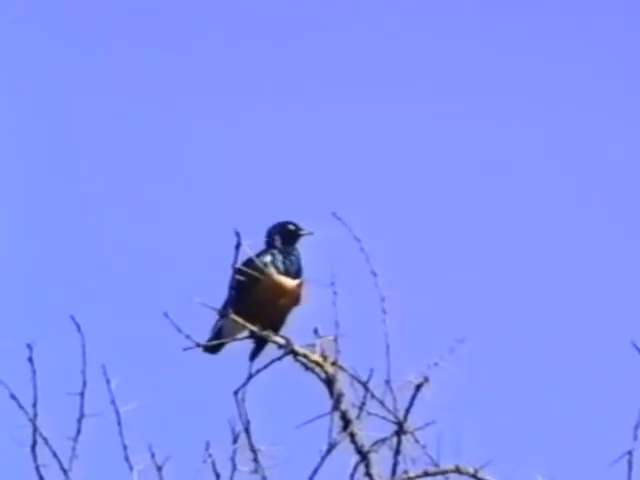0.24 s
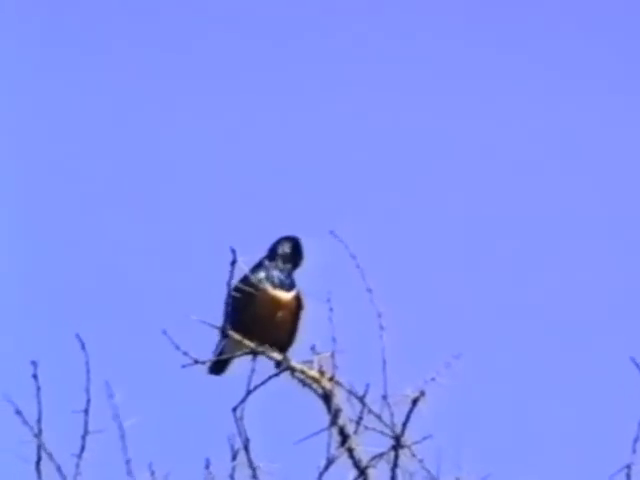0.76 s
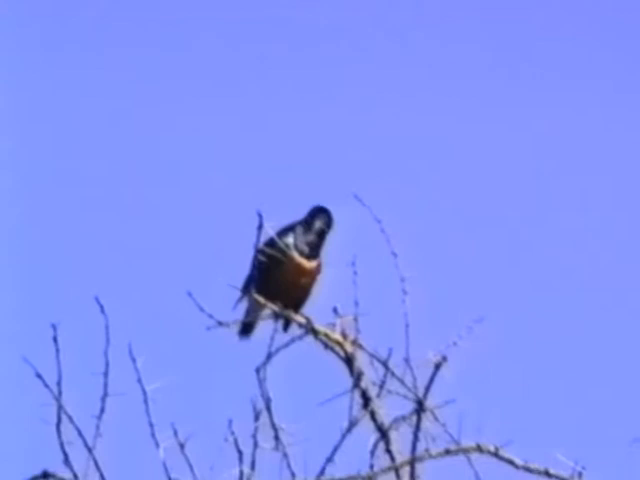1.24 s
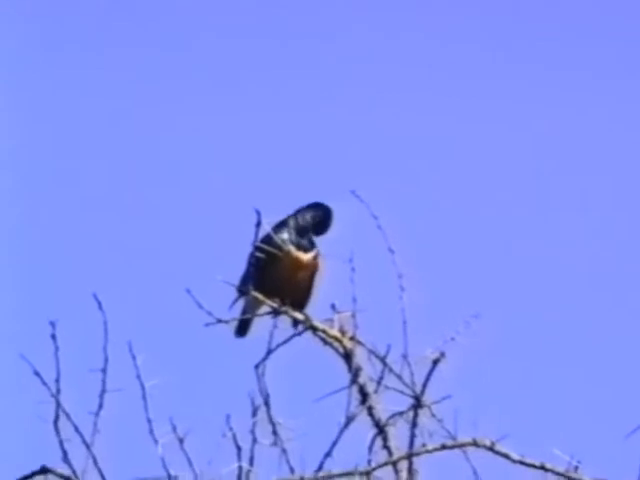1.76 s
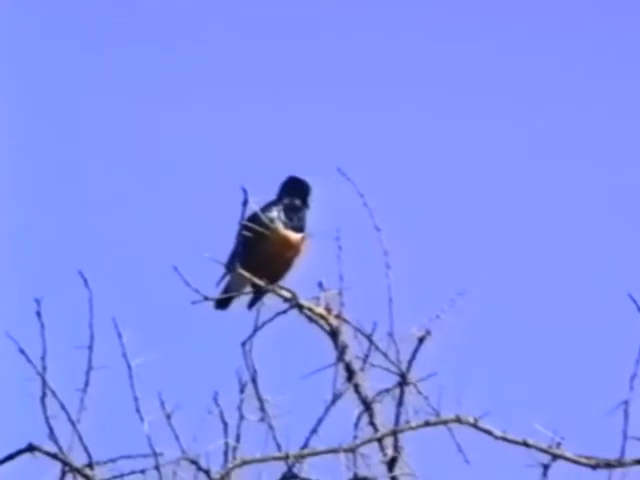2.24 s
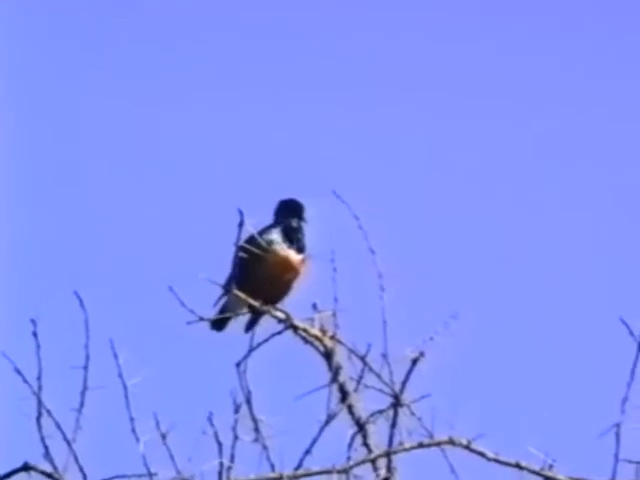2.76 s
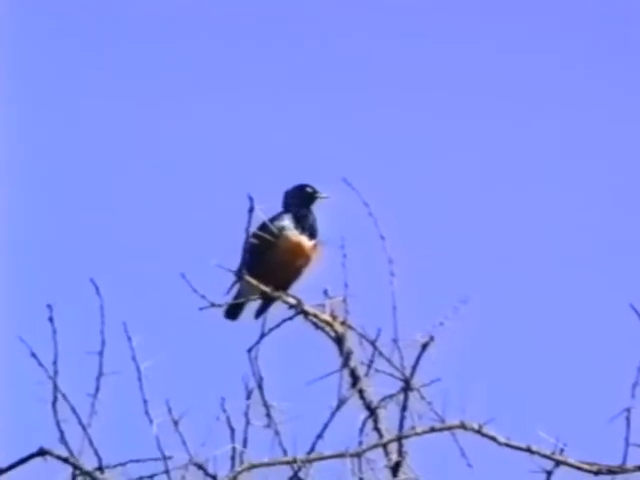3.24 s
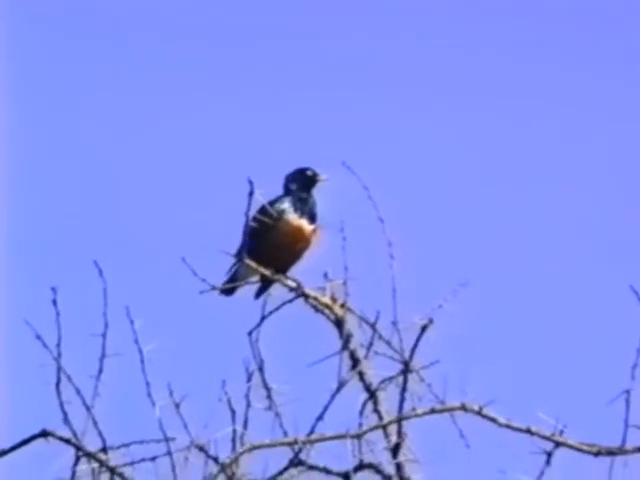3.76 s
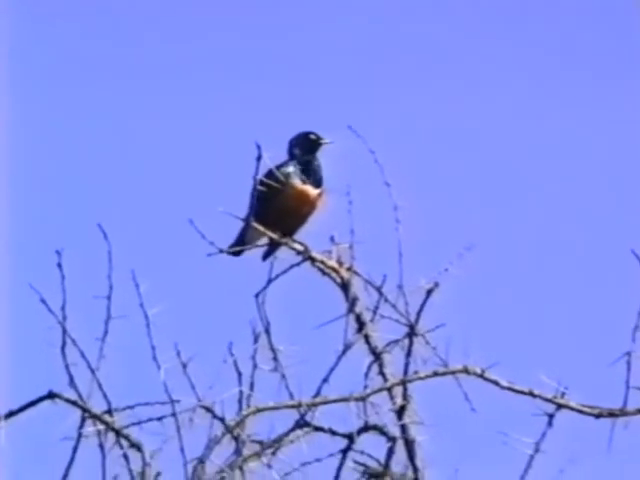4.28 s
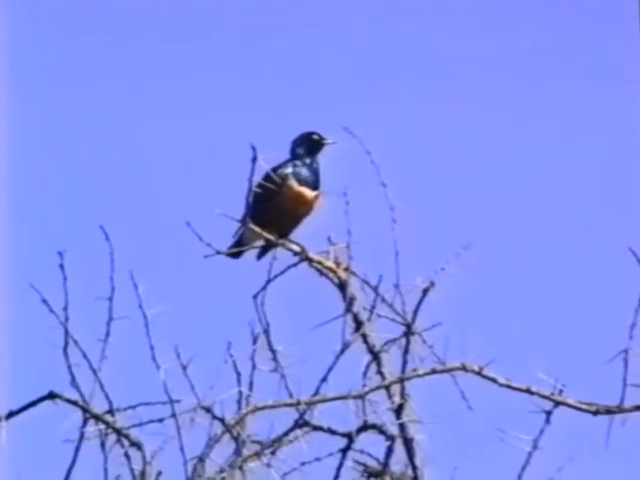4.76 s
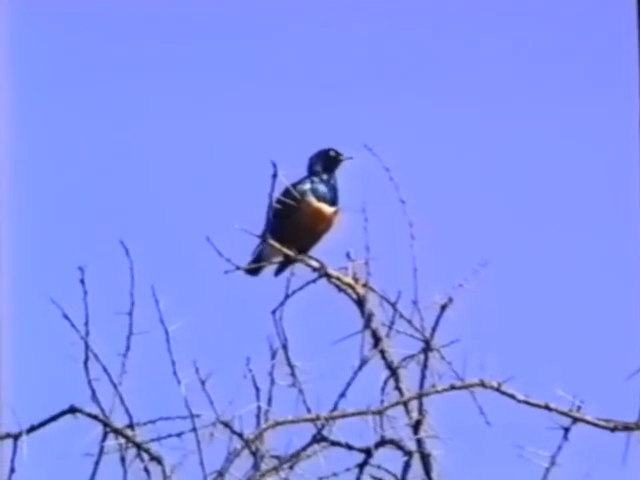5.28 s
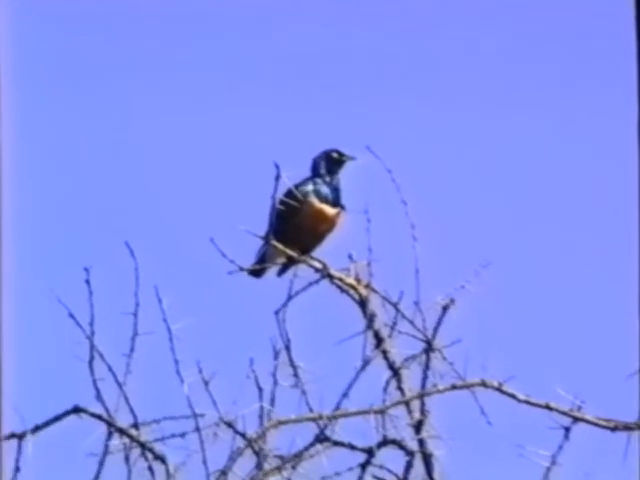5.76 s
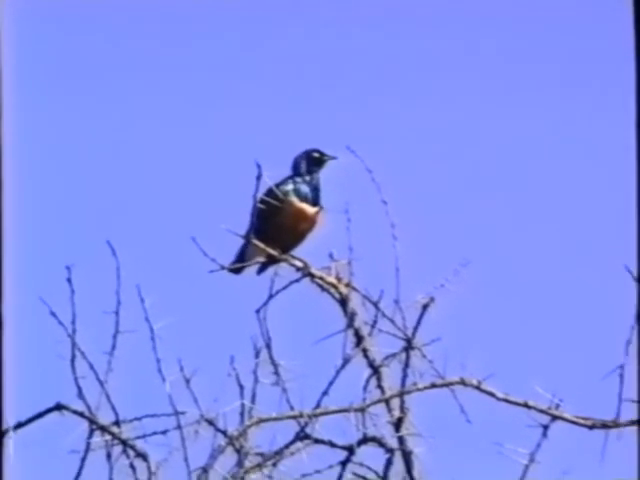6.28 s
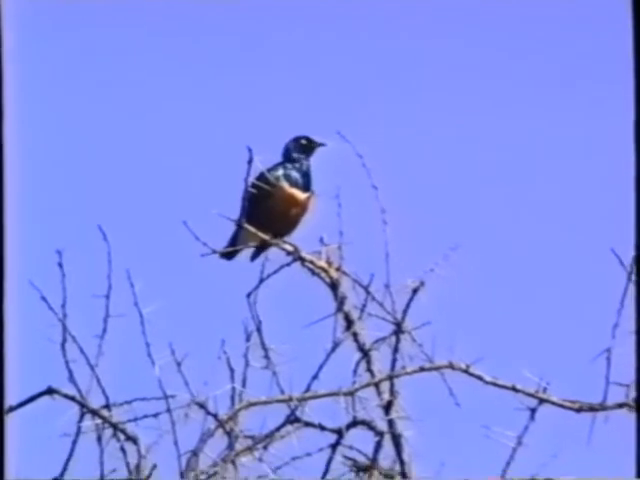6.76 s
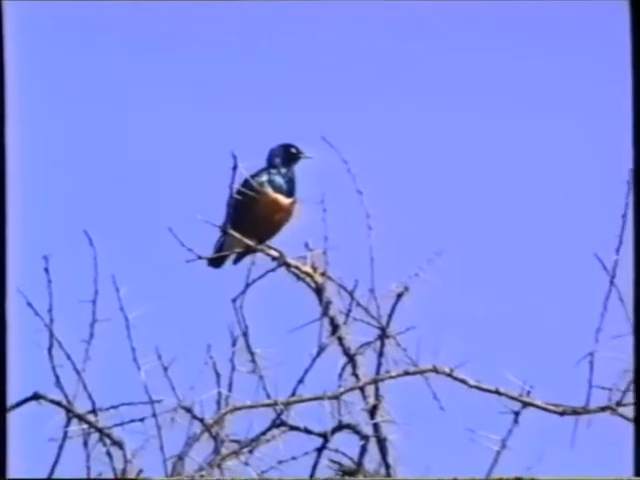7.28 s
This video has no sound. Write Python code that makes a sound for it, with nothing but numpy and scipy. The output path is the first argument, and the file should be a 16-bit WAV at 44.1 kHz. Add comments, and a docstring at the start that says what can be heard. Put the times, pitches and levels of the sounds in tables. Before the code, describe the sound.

A low mechanical hum and soft wind buffeting, far thin whistles, then a perched bird bursts into squeaky, scratchy chatter and buzz-to-whistle notes.

```python
"""First you hear a camcorder's own motor hum and hiss, with wind buffeting its microphone now and then.
Faint whistles and dry churrs come from farther off: wavering pure tones and short bursts of grainy noise.
Then a starling on a thorn bush sings chattering glides and whistles with both sides of its syrinx:
one side is a stack of harmonics coloured by windpipe and beak, the other is nearly pure tones.
A few small clicks close by are short, heavily damped rings."""
import sys
import numpy as np
from scipy import signal
from scipy.fft import rfft, irfft
from scipy.io import wavfile
from scipy.ndimage import uniform_filter1d

SR = 44100
rng = np.random.default_rng(int(sys.argv[2]) if len(sys.argv) > 2 else 0)


def to_wav(sig):
    """Store sig (one row per channel, or 1-D mono) as 16-bit WAV at the path in sys.argv[1].

    Samples outside -1..1 are clipped; the rate is SR.
    """
    pcm = np.clip(np.atleast_2d(sig), -1, 1) * 32767
    pcm = np.round(pcm).astype(np.int16)
    wavfile.write(sys.argv[1], SR, pcm.T)  # frames by channels


N = 331648
TIME = np.arange(N) / SR  # s
ALONG = np.linspace(0, 1, 200)  # how far through a note we are, 0-1
ENDS = (2 * ALONG - 1) ** 2  # 1 at both ends of a note, 0 in its middle
EDGE_HZ = 15750  # top of the recorder's band

# Levels in the tables are before any trim, wobble, filter or echo in the functions.

# tape drum: turns a second, and the multiple of that rate that hums
DRUM_HZ, HUM_ORDER = 12.5, 13
# unevenness within one turn of the drum: (multiple of drum rate, throb depth/0-1, phase swing/rad)
DRUM_UNEVENNESS = [(1, 0.17, 0.57), (2, 0.31, 0.056), (3, 0, 0.017), (4, 0, 0.2)]
# steady whines of the tape transport: (f/Hz, level/dB rms)
TRANSPORT_WHINE = [(263.8, -66.5), (452.2, -66.5), (694.4, -82), (899.0, -64.5), (957, -82), (1044, -73),
                   (1077, -72), (1540, -78.5), (1846, -77), (1949, -74), (2099, -81.5), (2401, -73),
                   (2552, -73), (2702, -72.5)]
# colour of the mechanism's whirr and hiss: (f/Hz, relative level/dB per Hz)
WHIRR_COLOUR = [(20, -6), (60, -22.5), (110, 13), (160, 19), (230, 3), (330, 5.5), (470, 2), (620, -1),
                (750, 2.5), (890, 4.5), (1200, -6), (2000, -8), (2700, -8.5), (3300, -10.5), (6000, -15),
                (16000, -16)]
WHIRR_DB = -51

# gusts on the microphone: (t/s, time to swell and to die/s, level/dB)
WIND_GUSTS = [(.06, .08, -53), (.26, 0.081, -50), (1.0, 0.061, -50), (1.38, 0.36, -52.5),
              (2.1, 0.26, -53.5), (3.2, .06, -53), (4.1, 0.24, -44), (4.62, 0.25, -66), (5.32, 0.12, -38.5),
              (5.98, 0.18, -44.5), (6.28, 0.18, -37), (7.46, 0.13, -46.5)]
# colour of the wind rumble: (f/Hz, relative level/dB per Hz)
WIND_COLOUR = [(10, -13), (22, -26), (35, -0.5), (65, -1.5), (110, -8), (200, -13), (400, -28.5),
               (900, -34), (3000, -44.5), (15000, -74)]
CALM_DB = -66  # wind level between gusts

# clicks and knocks near the microphone: (t/s, level/dB of the envelope's peak, ring f/Hz, swell time/s)
NEAR_CLICKS = [(2.267, -37, 1400, 0.00024), (4.516, -35.5, 900, 0.00063), (4.5153, -43.5, 2920, 0.00042),
               (4.526, -39, 490, 0.00096), (6.4265, -19.5, 2180, 0.00029), (6.4268, -31, 7740, 0.00012),
               (6.43, -44, 1940, 0.00027), (6.597, -39, 1000, 0.00047), (6.5997, -28, 390, 0.00088),
               (7.0727, -11.5, 4340, 0.000018)]

# faint slurs and pips: (t/s, length/s, from f/Hz, to f/Hz, bend, level/dB)
# here and below, a bend under 1 moves early and one over 1 moves late
FAINT_GLIDES = [(0.472, 0.085, 1920, 1460, 1.1, -68.5), (0.643, .03, 3210, 3210, 0.48, -68.5),
                (1.15, .03, 3310, 3270, 1.0, -69), (1.247, .026, 3360, 3170, 1.2, -64),
                (1.306, .035, 2460, 1530, 1.2, -65), (1.428, .09, 3820, 3210, 0.91, -72),
                (1.51, .04, 2680, 2560, 1.0, -72), (1.59, 0.036, 2840, 2640, 0.79, -64.5),
                (1.719, .018, 5800, 4000, 1.0, -69), (1.929, 0.024, 3210, 2990, .7, -63.5),
                (1.967, .018, 5300, 4400, 0.86, -68), (1.977, 0.038, 2980, 2250, 1.0, -66),
                (2.155, .025, 3250, 3200, 1.0, -70), (2.191, .016, 5340, 3580, 1.1, -66),
                (2.217, .014, 5300, 4930, 1.0, -67), (2.58, .045, 2640, 2760, 1.0, -62.5),
                (2.7, .032, 4400, 5200, 1.6, -67), (3.21, 0.053, 5440, 4130, 0.93, -67.5),
                (3.261, 0.068, 4160, 2800, 0.97, -57.5), (3.33, .028, 2820, 2940, 1.0, -67),
                (4.205, .075, 4800, 5950, 1.0, -73), (7.095, .032, 1720, 1750, 1.0, -56)]
# faint falling whistles that quaver: (t/s, length/s, from f/Hz, to f/Hz, bend, level/dB)
FAINT_QUAVERS = [(0.758, 0.12, 4030, 2770, .7, -65.5), (1.362, 0.16, 3940, 2534, 0.75, -62.5),
                 (2.407, .14, 3990, 2770, 1.2, -62.5)]
QUAVER_HZ, QUAVER_DEPTH = 81, .014  # depth as a share of the pitch
# faint rising whistles: (t/s, length/s, starting f/Hz, level/dB)
FAINT_RISERS = [(2.965, 0.14, 3680, -64.5), (3.512, .142, 3820, -65.5)]
# the climb they share: (share of length, pitch ratio)
SHARED_CLIMB = [(0, 1), (.26, 1.06), (.5, 1.33), (.8, 1.51), (1, 1.7)]
# faint rounded hoots: (t/s, length/s, top f/Hz, level/dB)
FAINT_HOOTS = [(.118, .076, 2110, -65.5), (1.78, .032, 5630, -70), (1.852, 0.083, 4280, -68.5),
               (2.008, 0.066, 2110, -60), (2.32, .072, 2100, -61.5), (2.625, .102, 1864, -61.5),
               (7.018, .09, 2070, -57.5), (7.332, .105, 1870, -59.5)]
HOOT_DROOP = 0.27  # share of the pitch lost at both ends
# short, dry churrs among the faint whistles: (t/s, length/s, level/dB)
DRY_CHURRS = [(0.71, 0.035, -63), (1.32, 0.14, -62.5), (2.03, 0.036, -62), (2.335, 0.054, -56.5)]
# colour of the churrs: (f/Hz, relative level/dB)
CHURR_COLOUR = [(1800, -30), (2700, 4), (3600, 5), (4500, -26)]

# colour of the open beak: (f/Hz, level/dB)
BEAK_COLOUR = [(600, -22), (1100, -11), (2300, -7), (3200, -7), (4400, -3), (5400, -3), (6800, -5),
               (8000, -12), (9500, -27), (14000, -46)]
BEAK_OPEN_HZ = 630  # below this pitch the beak closes and its resonances sink
# resonances of the windpipe: (f/Hz, width/Hz, lift/dB)
WINDPIPE_RESONANCES = [(2410, 1100, 7), (4370, 760, 7.5)]
# harsh stretches of the song: (t/s, length/s, level/dB)
HARSH_STRETCHES = [(5.035, 0.059, -67), (5.355, 0.2, -53), (5.635, 0.027, -46.5), (5.66, 0.13, -56.5),
                   (6.058, 0.063, -49), (6.325, 0.027, -47)]

# the refrain, a low buzz that breaks into a high whistle:
# (t/s of the break, buzz f/Hz, buzz level/dB, whistle top f/Hz, whistle level/dB,
#  second voice f/Hz, second voice level/dB)
REFRAIN_NOTES = [(5.117, 688, -46, 6820, -50.5, 4000, -58), (6.843, 698, -44, 6640, -47.5, 4320, -47),
                 (7.013, 738, -44, 6870, -46, 4000, -51), (7.248, 707, -47.5, 6760, -56, 4280, -51.5)]
BUZZ_HZ = 900  # a note whose average pitch is below this counts as a buzz
# the buzz climbs from a share of its pitch, holds, then lifts and swells just before the break
BUZZ_S, CLIMB_S, CLIMB_FROM = .115, 0.056, 0.5
LIFT_S, LIFT = .011, 0.248  # growth time, and final rise as a share of the pitch
BUZZ_START_DB, BUZZ_HOLD_DB, BUZZ_OVERTONES_DB = -10.5, -8.5, -7
# arch of the refrain's whistle:
# (top after the break/s, rise/s, fall/s, start share of pitch, end share of pitch, width of the top/s)
WHISTLE_ARCH = (0.0062, 0.022, 0.044, 0.27, .61, 0.013)
# arch of the second voice under it, with the same columns
SECOND_ARCH = (.006, 0.0265, 0.019, .91, .82, 0.057)
# chirps that rise and fall: (t/s of the top, rise/s, fall/s, start share of pitch, end share of pitch,
#  width of the top/s, top f/Hz, level/dB, overtones/dB)
RISE_AND_FALL_CHIRPS = [(4.603, .01, 0.021, 0.49, 0.47, 0.0076, 2490, -57.5, -4),
                        (4.876, 0.019, 0.046, .47, .35, 0.012, 5010, -48.5, -2),
                        (6.139, .007, .038, 0.84, 0.41, 0.0047, 2470, -46, 4),
                        (6.294, 0.0084, 0.0025, 0.71, .97, .01, 8300, -45, -3)]
ARCH_DB_PER_OCTAVE = 4.5  # an arch is louder where it is higher
# one-way glides: (t/s, length/s, from f/Hz, to f/Hz, bend, level/dB,
#  level change by the end/dB, overtones/dB)
LEADING_SLURS = [(4.523, 0.027, 2080, 1470, 1.0, -54, -4, -8), (4.755, 0.045, 2150, 1940, 0.91, -61, 1, -8),
                 (4.797, .025, 4270, 1590, .56, -51.5, 0.5, -6), (4.923, .045, 1880, 1300, .9, -63, 7, -9),
                 (5.523, 0.023, 6200, 3760, 0.83, -45, 1, -5), (5.546, .013, 3750, 4030, 1.1, -52, -1, -1),
                 (5.562, 0.056, 3300, 1056, .7, -46.5, -9, 2), (5.609, 0.021, 1066, 1490, 1.3, -53, -2, -6),
                 (5.623, .02, 3270, 2370, .9, -53, 9, -1), (5.646, 0.03, 2355, 2820, 0.88, -44, -3, 1),
                 (5.673, 0.027, 2100, 1830, .8, -50.5, 2, -3), (5.738, 0.085, 1207, 884, .8, -48, -5.5, -7),
                 (6.382, 0.023, 5140, 3680, 1.3, -39, -7, 10),
                 (6.405, 0.09, 2780, 856, 0.81, -42.5, -18.5, 1),
                 (6.746, .034, 2090, 3050, 1.2, -54, 0, 15), (7.148, .03, 2100, 3100, 1.2, -56, -4, 15)]
# free warbles, as short curves; a long warble takes two curves in a row: (t/s, f/Hz, level/dB)
WARBLE_CURVES = [
    [(5.22, 1424, -56), (5.236, 1940, -57), (5.264, 1610, -55), (5.279, 2690, -48)],
    [(5.311, 3520, -46), (5.321, 4820, -39), (5.345, 4620, -38), (5.359, 4220, -46), (5.364, 5440, -36),
     (5.369, 6870, -37), (5.375, 6960, -38), (5.38, 5650, -53)],
    [(5.391, 2440, -38), (5.399, 2970, -42), (5.415, 3070, -43), (5.424, 4830, -52), (5.429, 7180, -37),
     (5.436, 5320, -34), (5.444, 3330, -48), (5.449, 3220, -43), (5.462, 2350, -36)],
    [(5.462, 2255, -42), (5.48, 1776, -53), (5.5, 1530, -51.5), (5.521, 2190, -47)],
    [(5.987, 4130, -39), (5.994, 2730, -54), (6.004, 2494, -42.5), (6.013, 1385, -46), (6.022, 1194, -51),
     (6.05, 1044, -48), (6.07, 1410, -47), (6.088, 1000, -48)],
    [(6.09, 1065, -54), (6.112, 1018, -49), (6.126, 1374, -50), (6.134, 1830, -39)],
    [(6.235, 4600, -35), (6.239, 6920, -35), (6.247, 8000, -48), (6.253, 7940, -42), (6.258, 5080, -33.5),
     (6.263, 3220, -54), (6.271, 2090, -45)],
    [(6.313, 4910, -36), (6.317, 6570, -38), (6.323, 7080, -37.5), (6.329, 6580, -36.5), (6.334, 3790, -44),
     (6.343, 2580, -44), (6.352, 2170, -40), (6.38, 1280, -59)],
]
# a warble's overtones are strongest in the middle register
REGISTER_HZ, REGISTER_OCTAVES, REGISTER_DB, WARBLE_OVERTONES_DB = 2700, 0.88, 15.5, 0
OVERTONES_PER_DB = 0.63  # dB of overtones lost for each dB a note softens
# pure slurs from the other side of the syrinx: (t/s, length/s, from f/Hz, to f/Hz, bend, level/dB)
SECOND_GLIDES = [(4.567, .036, 4940, 4480, 1.1, -62), (4.912, .045, 2950, 1980, 1.0, -57),
                 (4.95, 0.075, 4550, 3740, 1.1, -55.5), (5.365, .072, 1850, 1690, 1.9, -55),
                 (5.462, .008, 4540, 7100, .8, -37), (5.469, .012, 7060, 7450, 1.0, -46),
                 (5.851, 0.023, 3470, 3230, 1.2, -54), (6.058, .018, 6040, 4480, 1.0, -45),
                 (6.315, 0.02, 5020, 3860, .5, -40), (6.926, .07, 2480, 3850, 0.48, -58)]
SLUR_EDGE_DB = -7  # pure slurs, hoots and risers swell from this relative level and sink back to it


def gain_of(db):
    """Turns decibels into amplitude: every 20 dB is a factor of ten."""
    return 10 ** (np.asarray(db) / 20)


def evened(x):
    """Scales a signal to an average (rms) strength of 1."""
    return x / np.sqrt(np.mean(x ** 2) + 1e-20)


def read(points, hz):
    """Reads a spectrum between its points on a log-frequency axis."""
    f, value = np.transpose(points)
    return np.interp(np.log(hz + 1), np.log(f + 1), value)


def add(mix, s, sound):
    """Mixes a sound in at time s, cutting off what runs past the end."""
    part = mix[round(s * SR):][:len(sound)]
    part += sound[:len(part)]


def noise(colour):
    """Steady noise: white noise with each frequency weighted by the colour, rms 1."""
    hz = np.fft.rfftfreq(N, 1 / SR)
    white = rfft(rng.standard_normal(N))
    return evened(irfft(white * gain_of(read(colour, hz)), N))


def waver(rate_hz):
    """Smooth random wobble, rms 1: noise that fades away above the given rate."""
    hz = np.fft.rfftfreq(N, 1 / SR)
    white = rfft(rng.standard_normal(N))
    return evened(irfft(white / (1 + (hz / rate_hz) ** 4), N))


def scatter(x, t60, wet_db):
    """Ground and thorn bushes return a thin, short spray of echoes, fading 60 dB in t60 seconds."""
    t = np.arange(SR // 2) / SR
    strength = rng.standard_normal(len(t))
    present = rng.random(len(t)) < 2000 / SR  # about 2000 echoes a second
    taps = strength * present * (t > .004) * gain_of(-60 * t / t60)
    echoes = signal.fftconvolve(x, taps / np.linalg.norm(taps))[:N]
    return x + gain_of(wet_db) * echoes


def settling(start_db=-3, settle_s=1.0):
    """The motor hum is heard a little softer at first, then its level rises and steadies."""
    return gain_of(start_db * np.exp(-TIME / settle_s))


def motor(hum_db=-44.5, wow=0.24, whine_wow=0.75, whine_db=-1, throb_db=1.26):
    """The drum's hum throbs and sways with every turn; the transport whines thinly above."""
    turn = 2 * np.pi * DRUM_HZ * TIME
    throb, sway = np.ones(N), np.zeros(N)
    for k, depth, swing in DRUM_UNEVENNESS:
        throb += depth * np.cos(round(k) * turn)
        sway += swing * np.cos(round(k) * turn + 2 * np.pi * rng.random())
    out = gain_of(hum_db) * throb * np.sin(HUM_ORDER * turn + sway + wow * waver(6.7))
    for hz, db in TRANSPORT_WHINE:
        level = gain_of(db + whine_db + throb_db * waver(30))
        out += level * np.sin(2 * np.pi * hz * TIME + whine_wow * waver(8.1))
    return np.sqrt(2) * out  # a sine of rms 1 peaks at root 2


def whirr(flicker_db=0.52):
    """Rubbing tape and gears ring the camera body, over hiss: coloured noise that flickers slightly."""
    return gain_of(WHIRR_DB + flicker_db * waver(25)) * noise(WHIRR_COLOUR)


def wind(lumps_db=3.3):
    """Eddies at the microphone rumble with each gust; the powers of calm air and gusts add up."""
    power = gain_of(CALM_DB) ** 2
    for s, swell, db in WIND_GUSTS:
        power = power + (gain_of(db) * np.exp(-abs(TIME - s) / swell)) ** 2
    return noise(WIND_COLOUR) * np.sqrt(power) * gain_of(lumps_db * waver(14))


def clicks(dull_hz=11500, order=3):
    """Each click is a short, heavily damped ring, rounded off in the top treble."""
    out, t = np.zeros(N), np.arange(SR // 30) / SR
    for s, db, hz, swell in NEAR_CLICKS:
        envelope = t / swell * np.exp(1 - t / swell)
        add(out, s, gain_of(db) * envelope * np.sin(2 * np.pi * hz * t))
    return signal.lfilter(*signal.butter(order, dull_hz, fs=SR), out)


def gesture(curves, cycles=9, size=130):
    """Sample numbers, a soft on-off gate and the smoothly joined controls of one curve."""
    s, *columns = curves
    at = np.arange(int(s.min() * SR), int(s.max() * SR))
    # averaging over a few milliseconds rounds the corners
    controls = [uniform_filter1d(np.interp(at / SR, s, c), size, mode="nearest") for c in columns]
    turns = np.cumsum(controls[0]) / SR  # the vibration needs a few cycles to build up and to die
    from_nearest_end = np.minimum(turns, turns[-1] - turns)
    gate = np.sin(np.pi / 2 * np.minimum(from_nearest_end / cycles, 1))
    return at, gate, controls


def slur(s, length, from_hz, to_hz, bend, db):
    """Time, pitch and level of a one-way glide that swells and sinks."""
    hz = from_hz * (to_hz / from_hz) ** (ALONG ** bend)
    return s + length * ALONG, hz, db + SLUR_EDGE_DB * ENDS


def arch(s, rise, fall, start, end, width, top_hz, db):
    """Time, pitch and level of a note that shoots up to a rounded top and relaxes."""
    t = (rise + fall) * ALONG - rise

    def drop(away):
        """Rounded fall away from the top."""
        return 1 - width / np.hypot(width, away)

    depth = np.where(t < 0, (1 - start) / drop(rise), (1 - end) / drop(fall))
    share = 1 - depth * drop(t)
    return s + t, top_hz * share, db + ARCH_DB_PER_OCTAVE * np.log2(share)


def buzz(break_s, hz, db):
    """Time, pitch and level of the buzz that leads into the refrain's whistle."""
    t = BUZZ_S * ALONG
    climb = np.minimum(t / CLIMB_S, 1)
    lift = np.exp((t - BUZZ_S) / LIFT_S)
    pitch = hz * CLIMB_FROM ** (1 - climb) * (1 + LIFT * lift)
    level = db + BUZZ_START_DB * (1 - climb) + BUZZ_HOLD_DB * (climb - lift)
    return break_s - BUZZ_S + t, pitch, level


def whistles(notes, jitter, shimmer_db, flutter_hz, level_db):
    """Nearly pure tones, slightly unsteady in pitch and level."""
    out, unsteady, flutter = np.zeros(N), waver(200), waver(flutter_hz)
    for note in notes:
        at, gate, (hz, db) = gesture(note)
        phase = 2 * np.pi * np.cumsum(hz * (1 + jitter * unsteady[at])) / SR
        level = gain_of(db + level_db + shimmer_db * flutter[at])
        out[at] += np.sqrt(2) * gate * np.sin(phase) * level
    return out


def rasps(stretches, colour, grain_db=3):
    """Where a syrinx vibrates irregularly, it sends out grainy noise."""
    out, source = np.zeros(N), evened(noise(colour) * gain_of(grain_db * waver(400)))
    for s, length, db in stretches:
        swell = np.sin(np.pi * np.clip((TIME - s) / length, 0, 1))
        out += gain_of(db) * swell * source
    return out


def faint_notes():
    """Lists the soft slurs, hoots, rising whistles and quavering falls as pitch and level curves."""
    notes = [slur(*row) for row in FAINT_GLIDES]
    hoot_shape = 1 - HOOT_DROOP * ENDS
    riser_shape = np.interp(ALONG, *np.transpose(SHARED_CLIMB))
    for rows, shape in ((FAINT_HOOTS, hoot_shape), (FAINT_RISERS, riser_shape)):
        for s, length, hz, db in rows:
            notes.append((s + length * ALONG, hz * shape, db + SLUR_EDGE_DB * ENDS))
    for row in FAINT_QUAVERS:
        s, hz, db = slur(*row)
        quaver = 1 + QUAVER_DEPTH * np.sin(2 * np.pi * QUAVER_HZ * (s - s[0]))
        notes.append((s, hz * quaver, db))
    return notes


def second_voice():
    """The other side of the syrinx arches under each refrain and adds slurs of its own."""
    delay, *shape = SECOND_ARCH
    arches = [arch(s + delay, *shape, hz, db) for s, *_, hz, db in REFRAIN_NOTES]
    return arches + [slur(*row) for row in SECOND_GLIDES]


def voiced(s, hz, db, overtones_db):
    """Adds the overtone strength to a note: it dulls as it softens."""
    return s, hz, db, overtones_db + OVERTONES_PER_DB * (db - db.max())


def leading_voice(whistle_overtones_db=-4):
    """Lists what the leading side of the syrinx sings as pitch, level and overtone curves."""
    notes = [voiced(*arch(*row), overtones_db) for *row, overtones_db in RISE_AND_FALL_CHIRPS]
    delay, *shape = WHISTLE_ARCH
    for s, buzz_hz, buzz_db, top_hz, top_db, _, _ in REFRAIN_NOTES:
        notes.append(voiced(*buzz(s, buzz_hz, buzz_db), BUZZ_OVERTONES_DB))
        notes.append(voiced(*arch(s + delay, *shape, top_hz, top_db), whistle_overtones_db))
    for *glide, db, fade_db, overtones_db in LEADING_SLURS:
        s, hz, _ = slur(*glide, db)
        notes.append(voiced(s, hz, db + fade_db * ALONG, overtones_db))
    for rows in WARBLE_CURVES:
        s, hz, db = np.transpose(rows)
        middle = np.exp(-(np.log2(hz / REGISTER_HZ) / REGISTER_OCTAVES) ** 2)
        notes.append(voiced(s, hz, db, WARBLE_OVERTONES_DB + REGISTER_DB * middle))
    return notes


def throat_db(hz):
    """Colour of windpipe and beak together: resonance peaks on top of the beak's curve."""
    peaks = sum(db / (1 + (2 * (hz - centre) / width) ** 2) for centre, width, db in WINDPIPE_RESONANCES)
    return read(BEAK_COLOUR, hz) + peaks


def song(jitter=0.011, shimmer_db=1.5, level_db=-1, overtone_db=-2, between_db=-6, rolloff_db=-2.0, count=12):
    """The syrinx glides from a low buzz to a high whistle; the throat picks out the harmonics."""
    out, unsteady, flutter = np.zeros(N), waver(760), waver(250)
    k = np.arange(1, count + 1)[:, None]  # harmonic numbers
    for note in leading_voice():
        at, gate, (hz, db, overtones_db) = gesture(note)
        phase = 2 * np.pi * np.cumsum(hz * (1 + jitter * unsteady[at])) / SR
        gape = np.minimum(hz / BEAK_OPEN_HZ, 1)
        source_db = (overtones_db + overtone_db) * (k > 1) + rolloff_db * np.log2(k)
        weight = gain_of(throat_db(k * hz / gape) + source_db) * (k * hz < EDGE_HZ)
        # in the low buzz the syrinx repeats itself only every third swing, so every third harmonic leads
        between = (k % 3 > 0) * (hz.mean() < BUZZ_HZ)
        weight = weight * gain_of(between_db * between)
        # dividing by the rms lets the weights set the colour, not the loudness
        tone = (weight * np.sin(k * phase)).sum(0) / np.sqrt((weight ** 2).sum(0) / 2)
        out[at] += gate * tone * gain_of(db + level_db + shimmer_db * flutter[at])
    return out


def scene():
    """Everything reaches one microphone, alike in both channels."""
    camera = settling() * motor() + whirr()
    near_clicks = scatter(clicks(), t60=0.068, wet_db=-18)
    faint = whistles(faint_notes(), jitter=0.0054, shimmer_db=2.0, flutter_hz=69.6, level_db=3.5)
    faint += rasps(DRY_CHURRS, CHURR_COLOUR)
    far_birds = scatter(faint, t60=0.24, wet_db=-8.0)
    second = whistles(second_voice(), jitter=0.0076, shimmer_db=3, flutter_hz=200, level_db=-4)
    starling = scatter(song() + second + rasps(HARSH_STRETCHES, BEAK_COLOUR), t60=.27, wet_db=-12)
    mono = camera + wind() + near_clicks + far_birds + starling
    return np.array([mono, mono])


def record(dry):
    """The recorder's band limit: a steep filter removes what lies above its top edge."""
    low_pass = signal.firwin(511, EDGE_HZ, window=("kaiser", 9), fs=SR)
    return signal.oaconvolve(dry, low_pass[None], "same", axes=1)


dry = scene()
out = record(dry)
to_wav(out)
```